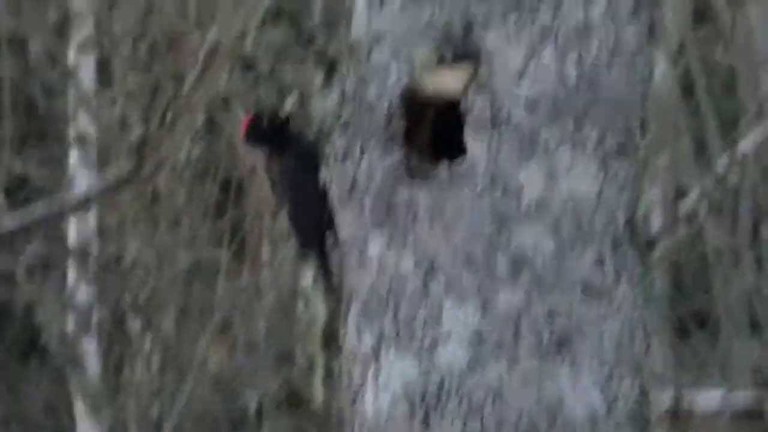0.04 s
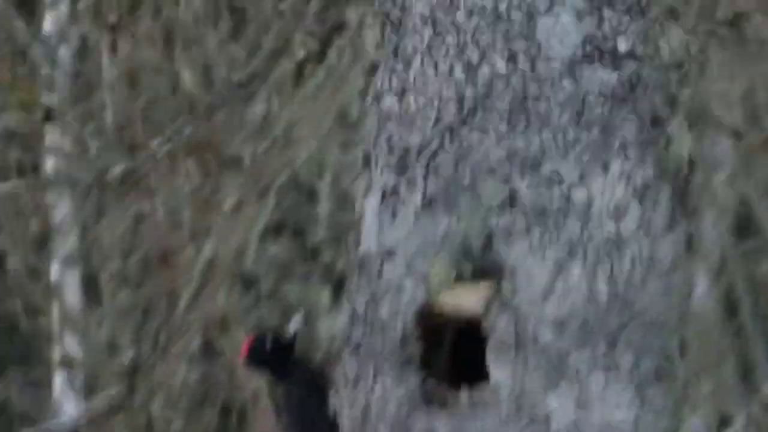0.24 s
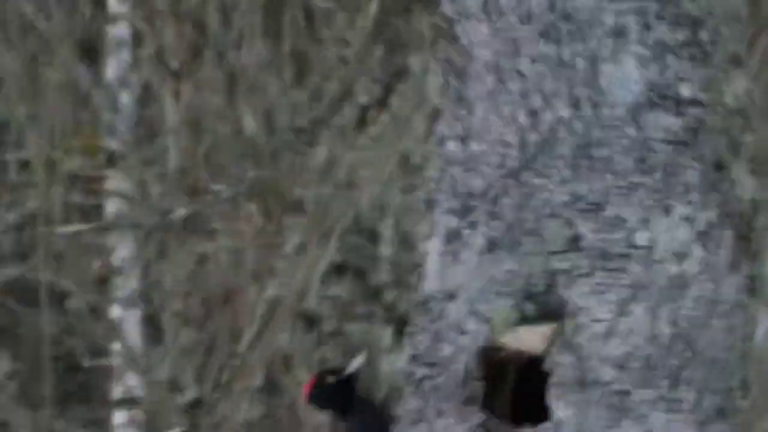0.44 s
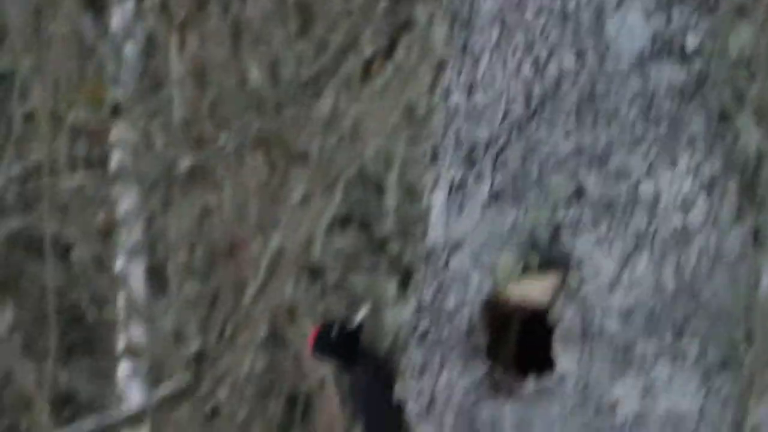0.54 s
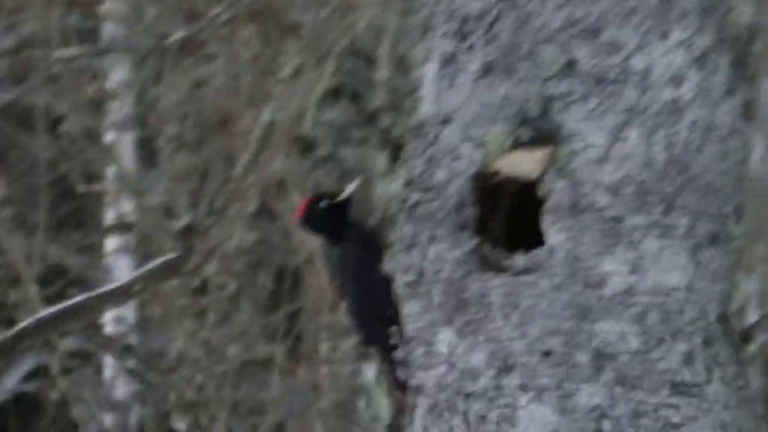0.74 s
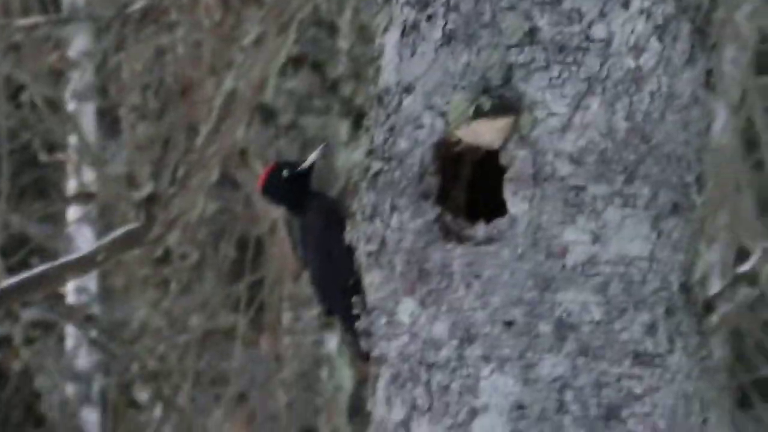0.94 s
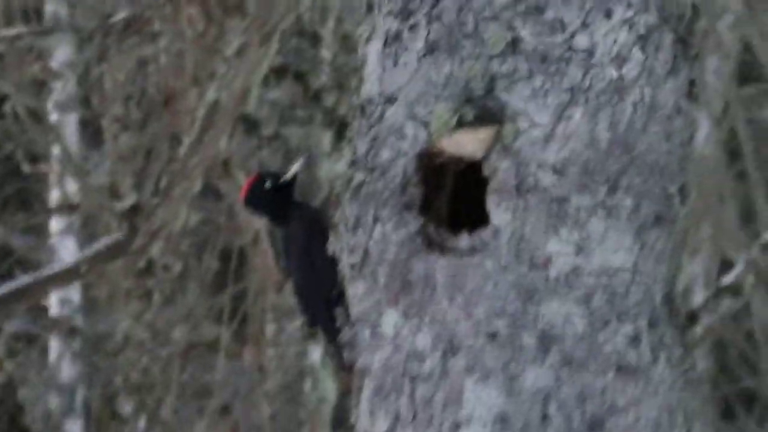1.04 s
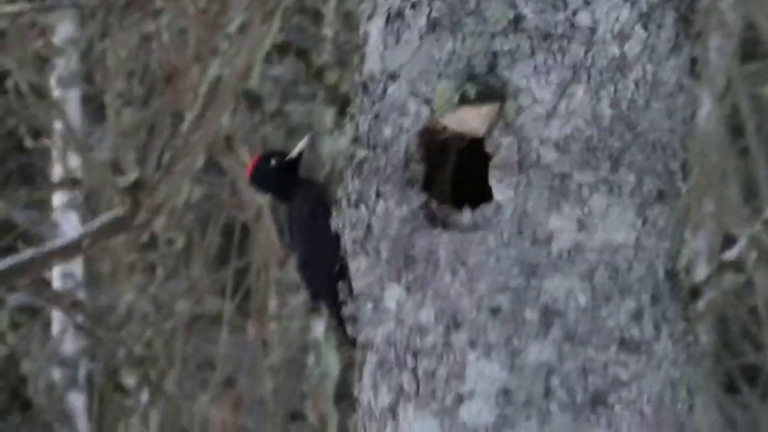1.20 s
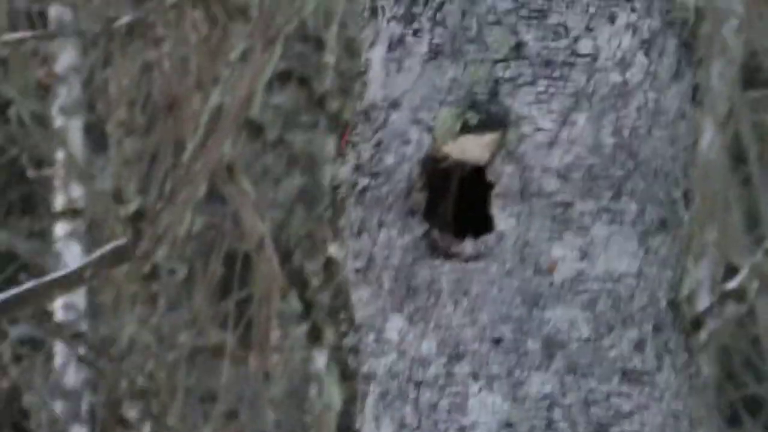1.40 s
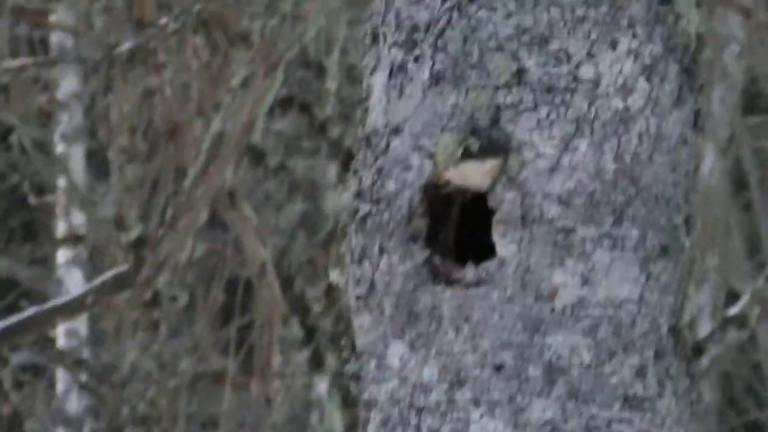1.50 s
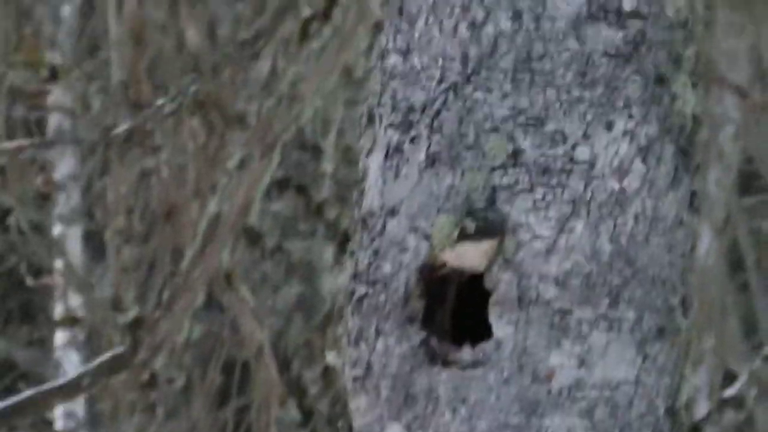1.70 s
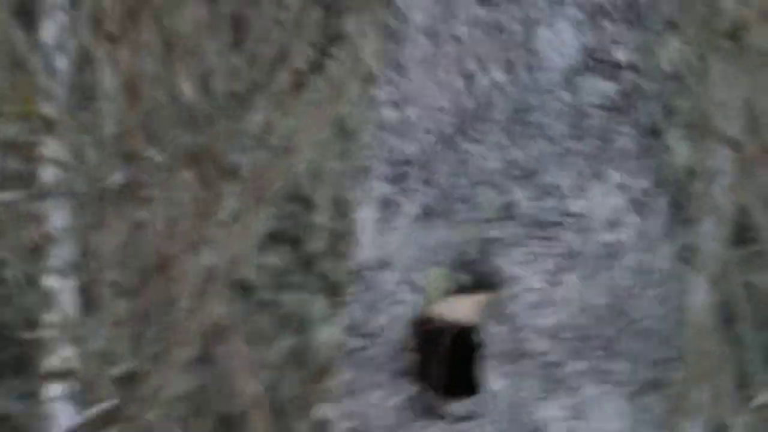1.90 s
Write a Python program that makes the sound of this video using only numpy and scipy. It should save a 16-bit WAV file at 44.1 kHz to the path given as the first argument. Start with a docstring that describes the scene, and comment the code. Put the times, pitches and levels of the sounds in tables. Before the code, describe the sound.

Close, sharp clicks come from a hand-held camera: first one loud clack over a thin zoom whir, later two softer clicks. Between them a bird gives one faint peep, with soft woodland air and finger noise throughout.

```python
"""A quiet wood, heard from the microphone of a hand-held camera, over a low hush of air among the trees.
From the start the casing ticks faintly in the hand, and a lens motor soon begins to whir.
At a quarter second, right by the microphone, a control snaps down and clacks home, ringing the casing.
As the motor stops, near 0.8 s, a small bird gives one thin peep, off among the trunks.
A second after the clack the control clicks twice more, and the hush and faint handling go on."""
import sys
import numpy as np
from scipy import signal
from scipy.fft import rfft, irfft
from scipy.io import wavfile
from scipy.ndimage import map_coordinates

SR = 44100
rng = np.random.default_rng(int(sys.argv[2]) if len(sys.argv) > 2 else 0)


def master_out(mix):
    """Clip the mix to full scale and print it as 16-bit PCM to the path in sys.argv[1]."""
    frames = np.transpose(np.atleast_2d(mix))
    ceiling = np.clip(frames, -1, 1)
    pcm = np.round(ceiling * 32767).astype(np.int16)
    wavfile.write(sys.argv[1], SR, pcm)


N = 85995

# Clicks of the control, right by the microphone: (time [s], crack level [dB], crack tilt [dB/octave],
# high modes [dB], low modes [dB], spring [dB], pitch of the casing modes [ratio])
CONTROL_CLICKS = [(0.2281, -17.5, -1.5, -18.5, -22, -62, .995), (0.2474, -19.5, 0.7, -9, -9, -40, 1),
                  (1.2061, -24.5, 0.7, -14, -36, -54, 1.025), (1.3392, -36, 5.5, -40, -56, -80, 1.04)]
# Modes of the casing: (frequency [Hz], level [dB], t60 [s])
CASING_MODES = [(778, -14.5, 0.041), (930, -23, 0.046), (1481, -5.5, .025), (1650, -12, 0.03),
                (2420, -7.5, 0.029), (2794, -13.5, 0.031), (3600, -13.5, 0.019), (4380, -10, 0.018),
                (5220, 4.5, .01), (5510, -7.5, 0.012), (6350, -11.5, 0.0086), (7450, -10.5, 0.013),
                (8480, -11.5, 0.0082)]
# The spring's long, faint ring: (frequency [Hz], level [dB], t60 [s])
SPRING_MODES = [(1320, -0.5, 0.2), (2525, -4, .13)]
# The crack of contact: (frequency [Hz], level [dB])
CRACK_COLOUR = [(300, -16), (550, -20), (800, 1.5), (1800, -16.5), (2700, -3.5), (3700, -2), (5200, 3),
                (6400, 0.5), (8700, -2), (9500, -10), (11200, -12.5), (12300, -9.5), (14200, -21),
                (16000, -33)]
# The control sliding just before it clacks home: (frequency [Hz], level [dB])
SLIDE_COLOUR = [(200, -35), (600, -15), (1000, -0.5), (1600, -14), (3300, -12), (4400, 5), (5100, 1.5),
                (5800, -8), (6500, -2.5), (7800, -24), (12000, -27), (16000, -33)]
# The camera body under the clack: overall level [dB], then (frequency [Hz], level [dB])
THUD_DB, THUD_COLOUR = -42, [(60, -28), (250, -3.5), (500, -14.5), (900, -16), (3000, -60)]

def control(split_hz=3200, thin_below_hz=700):
    """Closest in: each click cracks and rings the casing; the loudest slides in and also thuds."""
    low = [mode for mode in CASING_MODES if mode[0] < split_hz]
    high = [mode for mode in CASING_MODES if mode[0] >= split_hz]
    slide = amp(-25.5) * burst(0.2404, SLIDE_COLOUR, hold_s=0.0065, t60=0.019)
    clicks = np.zeros(N)
    for at, crack_db, tilt, high_db, low_db, spring_db, pitch in CONTROL_CLICKS:
        crack = burst(at, CRACK_COLOUR, hold_s=0.00126, t60=0.0112, tilt=tilt)
        tail = amp(-9.5) * burst(at, CRACK_COLOUR, hold_s=0.00126, t60=0.063, tilt=tilt)
        casing = amp(high_db) * ring(at, high, pitch) + amp(low_db) * ring(at, low, pitch)
        spring = amp(spring_db) * ring(at, SPRING_MODES)
        clicks += amp(crack_db) * (crack + tail) + casing + spring
    thin = signal.butter(3, thin_below_hz, "highpass", fs=SR, output="sos")
    clack_at = CONTROL_CLICKS[1][0]
    thud = amp(THUD_DB) * burst(clack_at, THUD_COLOUR, hold_s=0.0073, t60=0.042)
    return signal.sosfilt(thin, slide + clicks) + thud


# Faint ticks of the casing in the hand: (time [s], level [dB])
CASING_TICKS = [(.010, -42.5), (.034, -45), (.119, -43.5), (0.214, -41), (.388, -45), (.656, -57),
                (0.7, -43), (0.7207, -38.5), (.881, -47), (0.977, -52), (1.0248, -41.5), (1.070, -45.5),
                (1.117, -43), (1.166, -43.5), (1.2850, -52), (1.324, -47), (1.33, -44), (1.551, -43.5)]
# Bright sound of the casing, ticking or rubbed: (frequency [Hz], level [dB])
TICK_COLOUR = [(500, -45), (3000, -15), (5000, -5.5), (6400, 2.5), (8000, -4), (10000, -10.5), (12500, -10),
               (16000, -15)]
# Soft knocks of the fingers: (time [s], level [dB])
FINGER_KNOCKS = [(.807, -49), (1.233, -49), (1.266, -42.5)]
# Duller sound of a finger's knock: (frequency [Hz], level [dB])
KNOCK_COLOUR = [(200, -3), (800, -3), (1200, -9), (1700, 3.5), (2300, -14), (3600, -2.5), (4400, -5),
                (5500, -19), (12000, -33)]
# Skin rubbing the casing: (start [s], end [s], level [dB])
SKIN_RUBS = [(0, 0.128, -56), (0.534, 0.796, -63.5), (.93, 1.408, -59.5)]
# Rise and fall of the hand's rumble: (time [s], level [dB])
HAND_RUMBLE = [(0, -68), (.23, -50.5), (.31, -55.5), (.39, -52), (.48, -49), (.6, -60.5), (.85, -53.5),
               (1.17, -55), (1.25, -51), (1.55, -58), (1.7, -54), (1.95, -54.5)]
# That rumble's deep spectrum: (frequency [Hz], density [dB])
RUMBLE_COLOUR = [(15, -7), (45, -1), (80, -7.5), (160, -23.5), (500, -77)]

def handling(grain_db=5, grains_per_s=400):
    """The hand on the body that holds the microphone: ticks, knocks, grainy rubbing and rumble."""
    ticks = sum(amp(db) * burst(at, TICK_COLOUR, hold_s=0.00073, t60=0.012) for at, db in CASING_TICKS)
    knocks = sum(amp(db) * burst(at, KNOCK_COLOUR, hold_s=0.0027, t60=0.027) for at, db in FINGER_KNOCKS)
    grip = sum(amp(db) * gate(start, end, edge_s=0.01) for start, end, db in SKIN_RUBS)
    rubbing = grip * unit(noise(TICK_COLOUR) * amp(grain_db * wobble(grains_per_s)))
    rumble = amp(curve(HAND_RUMBLE)) * noise(RUMBLE_COLOUR)
    return ticks + knocks + rubbing + rumble


# Resonances of the lens motor, inside the camera: (frequency [Hz], half-width [Hz], level [dB])
MOTOR_RESONANCES = [(5350, 110, -5.5), (6100, 180, 0.5), (6800, 180, -11), (7100, 180, -13),
                    (8550, 440, -12), (10760, 250, -15), (13500, 700, -19)]

def lens_motor(rough_db=-0.5):
    """Close but faint, a thin and slightly grainy whir: noise in a few narrow resonances."""
    bins_hz = np.fft.rfftfreq(N, 1 / SR)
    gain = sum(amp(db) / (1 + ((bins_hz - hz) / width) ** 2) for hz, width, db in MOTOR_RESONANCES)
    whir = irfft(rfft(rng.standard_normal(N)) * gain, N)
    whir *= amp(rough_db * wobble(200))
    return amp(-56) * gate(start=0.117, end=0.77, edge_s=0.015) * unit(whir)


# The peep of a small bird, off in the trees: (time [s], pitch [Hz])
PEEP_PITCH = [(.773, 5400), (.779, 5210), (.787, 5266), (.806, 5220), (.819, 5290), (0.827, 5400)]

def bird(echo_db=-12, echo_t60=0.3):
    """One nearly level whistle reaches the microphone with a faint echo from the trunks."""
    phase = 2 * np.pi * np.cumsum(curve(PEEP_PITCH)) / SR
    note = gate(PEEP_PITCH[0][0], PEEP_PITCH[-1][0], edge_s=0.0032) * np.sin(phase)
    trunks = rng.standard_normal(N) * amp(-60 * clock() / echo_t60)
    echo = signal.fftconvolve(note, trunks / np.linalg.norm(trunks))[:N]
    return amp(-50.5) * np.sqrt(2) * (note + amp(echo_db) * echo)


# Air among the trees, behind everything: (frequency [Hz], density [dB])
AIR_COLOUR = [(20, -12.5), (60, -7.5), (115, -10.5), (200, -10), (350, -13.5), (600, -16.5), (920, -19.5),
              (1400, -25), (2400, -28), (4500, -27), (6500, -25.5), (7800, -29.5), (11800, -31),
              (13700, -29.5), (16000, -37.5)]
# Swells of a soft rustle in the wood: (time [s], level [dB])
RUSTLE_SWELLS = [(0, -60.5), (.3, -58), (.45, -56.5), (.58, -51), (.68, -54), (.81, -53), (.92, -59),
                 (1.05, -55.5), (1.25, -56.5), (1.45, -57.5), (1.7, -67), (1.95, -59)]
# That rustle's spectrum: (frequency [Hz], density [dB])
RUSTLE_COLOUR = [(60, -1.5), (200, -4.5), (380, 7), (560, -3), (760, 0.5), (1300, -6), (2050, -9.5),
                 (2450, -7.5), (3000, -10.5), (3750, -7.5), (6500, -13.5), (10000, -20), (16000, -35)]

def wood():
    """Farthest back: a steady hush of air, and a soft rustle that comes and goes."""
    rustle_db = curve(RUSTLE_SWELLS) + wobble(40.3)
    return amp(-52) * noise(AIR_COLOUR) + amp(rustle_db) * noise(RUSTLE_COLOUR)


def burst(at, points, hold_s, t60, tilt=0, attack_s=0.000266, size=4096):
    """A contact at a time [s]: a short burst whose energy is spread evenly over its colour."""
    t = np.arange(size) / SR
    attack = np.minimum((t + 1 / SR) / attack_s, 1)
    envelope = attack * amp(-60 * np.maximum(t - hold_s, 0) / t60)
    gain = colour(points, size, tilt)
    x = rng.standard_normal(size)
    for _ in range(4):  # impose envelope and colour in turn
        phase = np.angle(rfft(x * envelope))
        x = irfft(gain * np.exp(1j * phase))
    x *= np.sqrt(envelope)
    x *= np.linalg.norm(envelope) / np.linalg.norm(x)
    return np.pad(x, (max(round(at * SR), 0), N))[:N]


def ring(at, modes, pitch=1, attack_s=0.00046):
    """Damped modes struck at a time [s]."""
    t = np.maximum(clock() - at, 0)
    partials = sum(amp(db - 60 * t / t60) * np.sin(2 * np.pi * pitch * hz * t) for hz, db, t60 in modes)
    return partials * (1 - np.exp(-t / attack_s))


def colour(points, size, tilt=0):
    """Gain per FFT bin from (frequency [Hz], level [dB]) points, tilted in dB per octave."""
    hz, db = np.transpose(points)
    octave = np.log2(np.fft.rfftfreq(size, 1 / SR) + 1)
    octaves_from_top = np.maximum(octave, np.log2(hz[0])) - np.log2(hz[-1])
    return amp(np.interp(octave, np.log2(hz), db) + tilt * octaves_from_top)


def noise(points):
    """Steady coloured noise of rms 1."""
    white = rfft(rng.standard_normal(2 * N))
    return unit(irfft(white * colour(points, 2 * N))[:N])


def wobble(rate):
    """A smooth random curve, rate knots a second."""
    knots = rng.standard_normal(int(N * rate / SR) + 4)
    return map_coordinates(knots, [clock() * rate])


def curve(points):
    """Straight lines through (time [s], value) points."""
    return np.interp(clock(), *np.transpose(points))


def gate(start, end, edge_s):
    """On between two times [s], with sloped edges."""
    return np.clip(np.minimum(clock() - start, end - clock()) / edge_s, 0, 1)


def amp(db):
    """Decibels to gain."""
    return 10 ** (np.asarray(db) / 20)


def unit(x):
    """Scale to rms 1."""
    return x / np.sqrt(np.mean(x ** 2) + 1e-20)


def clock():
    """Time of each sample [s]."""
    return np.arange(N) / SR


def scene():
    """The camera close up and the wood behind it, at one microphone."""
    return (control() + handling() + lens_motor() + bird() + wood())[None]


def record(dry, top_hz=15850):
    """The camera keeps nothing above its band limit."""
    passband = np.fft.rfftfreq(2 * N, 1 / SR) < top_hz
    return irfft(rfft(dry, 2 * N) * passband)[..., :N]


dry = scene()
out = record(dry)
master_out(out)
```